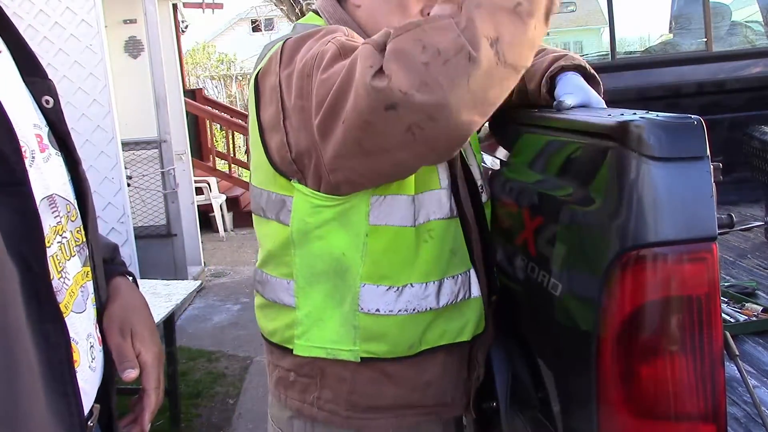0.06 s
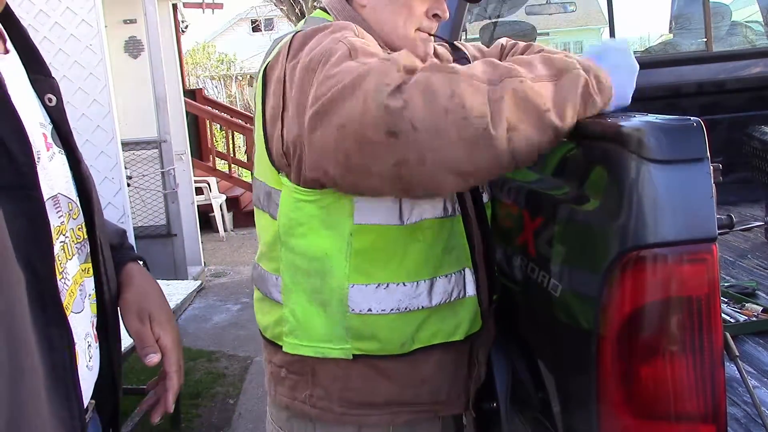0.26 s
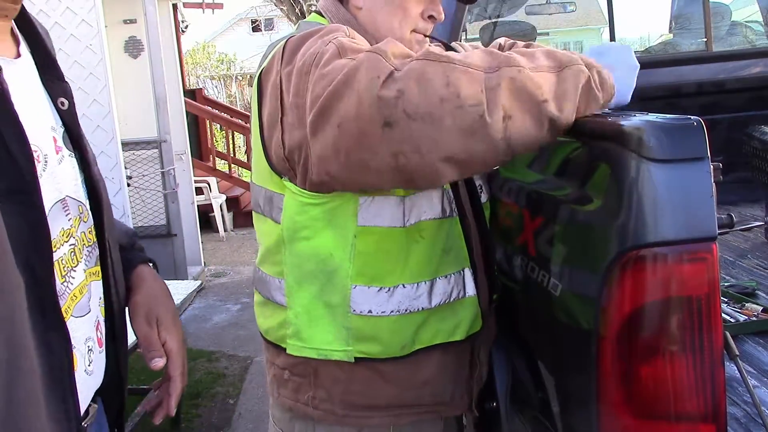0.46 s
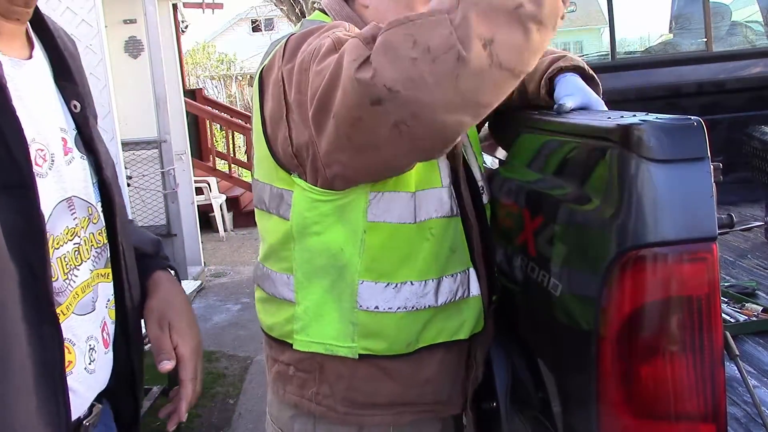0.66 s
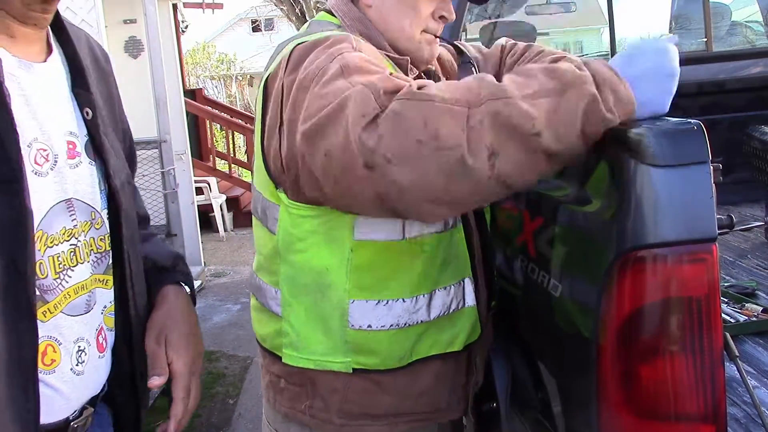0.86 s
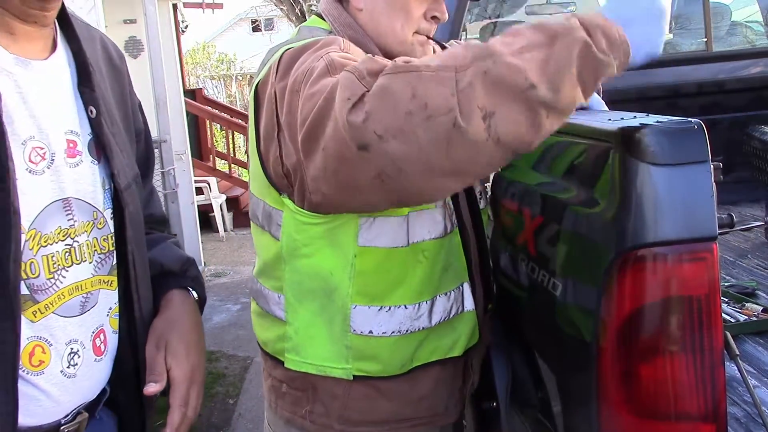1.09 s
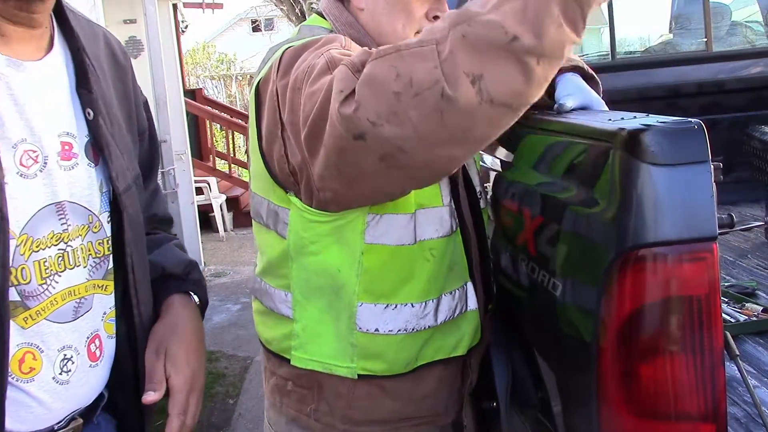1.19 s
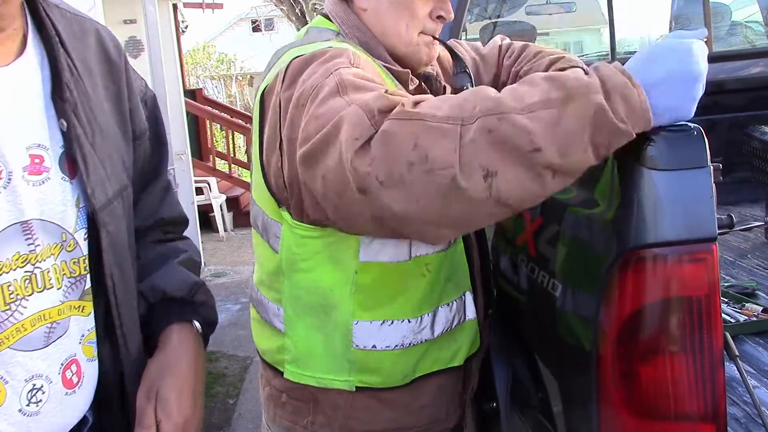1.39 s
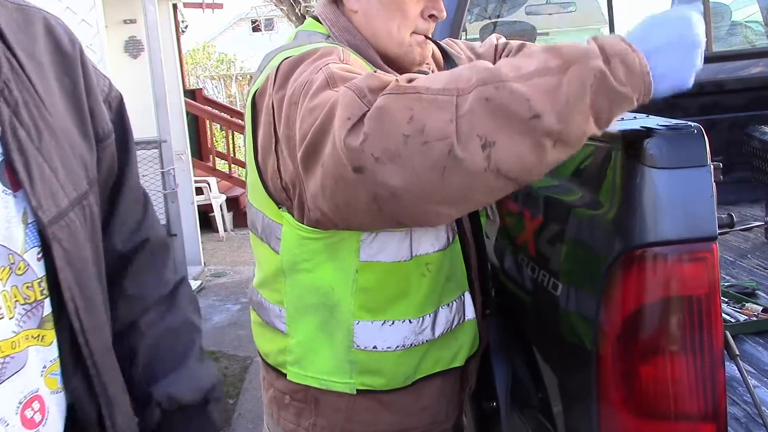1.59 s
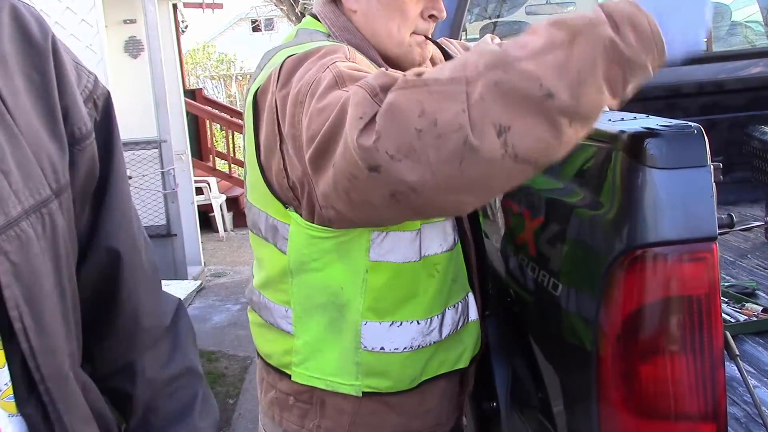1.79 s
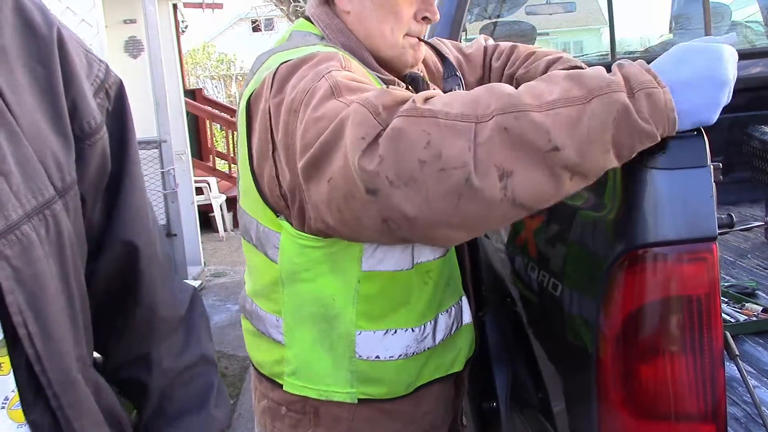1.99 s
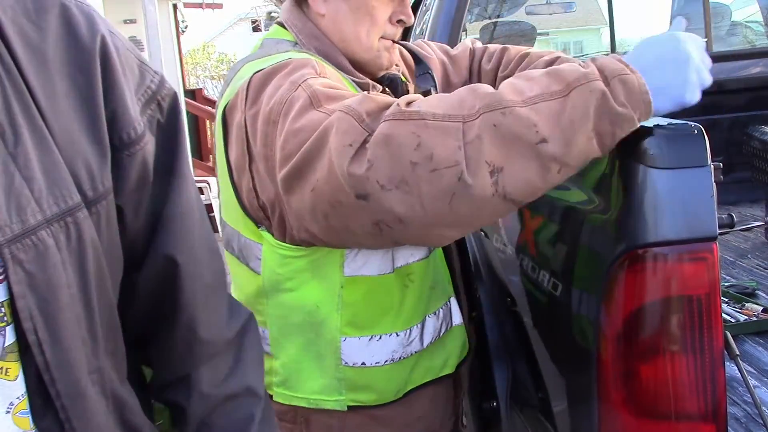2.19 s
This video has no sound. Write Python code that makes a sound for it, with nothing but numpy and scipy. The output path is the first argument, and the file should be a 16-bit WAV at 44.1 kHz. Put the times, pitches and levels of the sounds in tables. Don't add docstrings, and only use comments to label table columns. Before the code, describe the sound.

Close and slightly overloaded, a gloved hand pounds plastic onto a truck's steel bed four times, each sharp crack followed by a hollow boom, rebound and buzzing trim, over soft outdoor hiss and a faint distant engine.

```python
import sys
import numpy as np
from scipy import signal
from scipy.fft import rfft, irfft, next_fast_len
from scipy.io import wavfile
from scipy.ndimage import map_coordinates

SR = 44100
rng = np.random.default_rng(int(sys.argv[2]) if len(sys.argv) > 2 else 0)


def log_audio(samples):
    frames = np.atleast_2d(samples).T
    limited = np.clip(frames, -1, 1)
    pcm = np.round(limited * 32767).astype(np.int16)
    wavfile.write(sys.argv[1], SR, pcm)


def convert_level_to_amplitude(level_db):
    exponent = np.asarray(level_db, float) / 20
    return 10 ** exponent


N = 99225
RING_TIME_S = np.arange(2 * SR // 3) / SR

# start_s, force_db, tilt_db_per_octave, ring_length_factor, boom_db
BLOW_EVENTS = [
    (0.232, -3.5, 0.5, 0.96, -1.5),
    (0.8228, -5.5, -1, 0.97, -6),
    (1.3563, -7, 2, 0.9, 1),
    (1.8438, -9, -0.5, 0.86, -4.5),
]
# freq_hz, level_db
FAR_SIDE = [(30, -12), (100, -21), (400, -17), (1500, -15.5), (5000, -11.5), (8000, -14), (15000, -22)]


def unit(x):
    return x / np.sqrt(np.mean(x ** 2, axis=-1, keepdims=True) + 1e-20)


def along(points, hz):
    point_hz, value = np.transpose(points)
    return np.interp(np.log(hz + 1), np.log(point_hz + 1), value)


def filtered(x, response):
    size = next_fast_len(x.shape[-1] + 8192)
    spectrum = rfft(x, size) * response(np.fft.rfftfreq(size, 1 / SR))
    return irfft(spectrum, size)[..., :x.shape[-1]]


def wobble(rate_hz):
    knots = rng.standard_normal(int(N * rate_hz / SR) + 4)
    return map_coordinates(knots, [np.arange(N) * rate_hz / SR])


def add(out, start_s, sound):
    i = round(start_s * SR)
    out[..., i:i + sound.shape[-1]] += sound[..., :out.shape[-1] - i]


def narrow_noise(hz, width_hz):
    noise = rng.standard_normal(len(RING_TIME_S))
    return unit(filtered(noise, lambda f: np.exp(-((f - hz) / width_hz) ** 2)))


def clicks(rows, cycles, crack, soft_s):
    out = np.zeros(N)
    t = np.arange(SR // 16) / SR
    crack_corner_hz, crack_decay_s = 7400, 0.0019
    for start_s, peak_db, hz in rows:
        tone = np.sin(2 * np.pi * hz * t) * np.exp(-t * hz / cycles)
        grit = filtered(rng.standard_normal(len(t)),
                        lambda f: f / hz / (1 + (f / hz) ** 2) / (1 + (f / crack_corner_hz) ** 2))
        burst = crack * unit(grit) * np.exp(-t / crack_decay_s)
        onset = 1 - np.exp(-t / soft_s)
        add(out, start_s, convert_level_to_amplitude(peak_db) * (tone + burst) * onset)
    return out


def yard_air():
    # freq_hz, level_db_per_hz
    air_colour = [(18, -30), (30, -23), (109, -7), (415, -12), (540, -16.5), (2980, -29), (3490, -29),
                  (3980, -38.5), (16000, -51)]
    level_db, gust_db = -46, 1.8
    hiss = filtered(rng.standard_normal((2, N)),
                    lambda hz: convert_level_to_amplitude(along(air_colour, hz)) * [np.ones_like(hz), convert_level_to_amplitude(along(FAR_SIDE, hz))])
    return convert_level_to_amplitude(level_db + gust_db * wobble(5.35)) * hiss / hiss[0].std()


def far_engine():
    idle_hz, width_hz, level_db = 110, 31, -41
    throb_hz, throb_db = 19, 4.5
    drone = unit(filtered(rng.standard_normal(N), lambda hz: np.exp(-((hz - idle_hz) / width_hz) ** 2)))
    throb = np.sin(2 * np.pi * throb_hz * np.arange(N) / SR + wobble(2.5))
    return convert_level_to_amplitude(level_db + throb_db * throb) * drone


def fading_ring():
    ring_hz, level_db, t60_s = 3450, -57.5, 0.9
    t = np.arange(N) / SR
    level = convert_level_to_amplitude(level_db - 60 * t / t60_s + 2.1 * wobble(60))
    return level * np.sin(2 * np.pi * ring_hz * t + 0.82 * wobble(86))


def sleeve():
    # start_s, level_db
    arm_motion = [(0, -65), (.06, -61), (.085, -59), (.15, -71), (.2, -53.5), (.3, -67), (.8, -71),
                  (.95, -53.5), (1.198, -62), (1.3, -67), (1.6, -59), (1.72, -55.5), (1.8, -55),
                  (2.0, -56.5), (2.1, -60.5), (2.13, -53), (2.201, -53), (2.25, -55.5)]
    # freq_hz, level_db_per_hz
    cloth_colour = [(200, -1), (600, 13), (1200, 9.5), (3000, -1), (4500, -6.5), (8000, -6), (12000, -15),
                    (16000, -24)]
    point_s, level_db = np.transpose(arm_motion)
    motion_db = np.interp(np.arange(N) / SR, point_s, level_db)
    grain = convert_level_to_amplitude(motion_db + 2.2 * wobble(270) + 3.1 * wobble(29.84))
    cloth = filtered(rng.standard_normal((2, N)) * grain, lambda hz: convert_level_to_amplitude(along(cloth_colour, hz)))
    side = filtered(cloth[1], lambda hz: convert_level_to_amplitude(4 + along(FAR_SIDE, hz)))
    return np.array([convert_level_to_amplitude(9) * cloth[0], side])


def loose_ticks():
    # start_s, peak_db, pitch_hz
    tick_events = [(0.0774, -36, 5300), (0.1876, -31, 5500), (0.1916, -26, 5650), (0.217, -40, 6400),
                   (0.2235, -33, 5290), (0.4254, -32, 5420), (0.4668, -52, 5880), (0.5464, -33.5, 6130),
                   (0.585, -37, 6700), (.976, -40, 6900), (1.197, -33, 7540), (1.209, -44, 6160),
                   (.067, -46, 5600), (.64, -43.5, 5980), (1.117, -47, 1500),(1.0575, -41, 7800),
                   (1.1084, -44, 7600), (1.1914, -37, 6750), (1.204, -44.5, 6600), (1.5214, -37, 5520),
                   (1.5798, -50, 5750), (1.591, -34.5, 6050), (1.635, -27, 6240), (1.6413, -34, 5760),
                   (1.672, -31.5, 6400), (1.929, -38.5, 7230), (2.0757, -44, 5470), (2.1993, -40, 7900)]
    return convert_level_to_amplitude(-1.0) * clicks(tick_events, cycles=6.2, crack=0.55, soft_s=0.00056)


def cap_taps():
    # start_s, peak_db, pitch_hz
    tap_events = [
        (.078, -23.5, 2420),
        (.0785, -28.5, 1265),
        (.195, -26.5, 1780),
        (.196, -30, 595),
        (.079, -34.5, 613),
        (.2235, -31, 1960),
        (.586, -27, 1760),
        (2.115, -32.5, 1970),
    ]
    return clicks(tap_events, cycles=3.1, crack=0.34, soft_s=0.00031)


def bed_boom():
    # rise_time_factor, deep_bass_db
    grip = [
        (1.26, -9),
        (0.47, 2),
        (0.75, 3),
        (0.24, -12),
    ]
    # start_s, force_db, tilt_db_per_octave, ring_length_factor, boom_db
    rebounds = [
        (.285, -6.5, 0, 0.58, -3),
        (.87, -6.5, 0, 0.59, -0.5),
        (1.405, -9.5, 0.5, 0.66, -0.5),
        (1.858, -34, -4, 0.9, -1.5),
        (.965, -16.5, 2.5, .35, -7),
        (1.025, -19, -2.5, 0.24, -4),
        (1.062, -25, -1.5, 0.15, 1),
    ]
    # freq_hz, level_db_per_hz
    mode_colour = [(35, -42), (60, -16), (110, -8), (354, -2), (593, -8), (1220, -11.5), (1550, -13),
                   (2000, -14.5), (9790, -33.5), (16000, -44.5)]
    # freq_hz, t60_s
    early_t60 = [(80, 0.45), (200, 0.66), (500, 0.51), (1200, 0.27), (3000, 0.2), (7000, 0.13),
                 (15000, 0.11)]
    # freq_hz, rise_s
    rise_curve = [(80, 0.029), (180, 0.026), (350, 0.012), (800, 0.0049), (3000, 0.0033)]
    # freq_hz, level_db
    late_level = [(100, -13), (500, -16), (2000, -17), (6000, -19.5), (15000, -20)]
    # freq_hz, t60_s
    late_t60 = [(100, 1.94), (500, 1.164), (2000, 0.82), (6000, 0.64), (15000, 0.59)]
    # freq_hz, level_db
    side_level = [(60, -32), (400, -39.5), (1500, -23), (5000, -13), (15000, -18)]
    rebound_rise_s, rebound_deep_db = 0.013, -1.5

    out, t = np.zeros((2, N)), RING_TIME_S
    centres_hz = np.geomspace(60, 16000, num=25)[:, None]
    log_step = np.log(centres_hz[1] / centres_hz[0])

    def band_split(hz):
        overlap = 1 - np.abs(np.log((hz + 1) / centres_hz)) / log_step
        return np.clip(overlap, 0, 1) ** 0.5 * convert_level_to_amplitude(along(mode_colour, hz))

    hits = [(row, slower * along(rise_curve, centres_hz), deep_db)
            for row, (slower, deep_db) in zip(BLOW_EVENTS, grip)]
    hits += [(row, rebound_rise_s, rebound_deep_db) for row in rebounds]
    for (start_s, force_db, tilt_db, longer, boom_db), rise_s, deep_db in hits:
        colour_db = force_db + tilt_db * np.log2(centres_hz / 700)
        colour_db = colour_db + boom_db * (centres_hz < 450) + deep_db * (centres_hz < 150)
        early = convert_level_to_amplitude(-60 * t / (longer * along(early_t60, centres_hz)))
        late = convert_level_to_amplitude(along(late_level, centres_hz) - 60 * t / (longer * along(late_t60, centres_hz)))
        shape = convert_level_to_amplitude(colour_db) * (1 - np.exp(-t / rise_s)) ** 2 * (early + late)
        for channel, spread in enumerate([1, convert_level_to_amplitude(along(side_level, centres_hz))]):
            bands = filtered(rng.standard_normal(len(t)), band_split)
            add(out[channel], start_s, (bands * shape * spread).sum(0) / bands.sum(0).std())
    return out


def struck_spots():
    # freq_hz, level_db, t60_s
    spot_modes = [
        [(198.5, -14, 0.63), (350.6, 0.5, 0.5), (401.3, -8, 0.72), (739, -9, 0.48), (1129, -12.5, 0.31),
         (1346, -6.5, 0.31)],
        [(191, -7.5, 0.8), (354.4, 2.5, 0.37), (404.5, -8, 0.56), (529, -6.5, 0.44), (650, -9, 0.17),
         (950, -10, 0.52)],
        [(344, -15, 0.59), (551, -6, 0.58), (734, -16, 0.36), (1488, -1, 0.27), (1598, -7.5, 0.37),
         (1640, -8, 0.4)],
        [(147.7, -8, 0.69), (189.7, -10, 0.64), (510, -17, 0.31), (750, -7.5, 0.29), (764.4, 1, 0.17),
         (1235, -5.5, 0.16)],
    ]
    level_db, rise_cycles = -3.5, 2.7
    out, t = np.zeros(N), RING_TIME_S
    for (start_s, force_db, *_), modes in zip(BLOW_EVENTS, spot_modes):
        for hz, mode_db, t60_s in modes:
            onset = (1 - np.exp(-t * hz / rise_cycles)) ** 2
            fade = convert_level_to_amplitude(force_db + level_db + mode_db - 60 * t / t60_s)
            add(out, start_s, fade * np.sin(2 * np.pi * hz * t) * onset)
    return out


def clip_snaps():
    # start_s, peak_db, pitch_hz
    snap_events = [(.232, -15, 8000), (.2322, -13.5, 900), (.2338, -9, 3320), (.2378, -1.5, 4750),
                   (.2385, -8, 1500), (.2455, 0.5, 2180), (.2495, -3, 2320), (.2422, -4.5, 4100),
                   (.2435, -19, 1480), (.8229, -12, 1300), (.824, -2, 4120), (.8241, -3.5, 1387),
                   (.8282, -14, 3000), (.8305, -5.5, 3120), (.8335, -6.5, 8200), (1.3566, -8, 1100),
                   (1.3568, -8, 7970), (1.3595, -23.5, 2514), (1.3635, 0, 3230), (1.366, -0.5, 6140),
                   (1.369, -1, 3100), (1.3715, 1, 1290), (1.374, 1, 1630), (1.377, -7, 1640),
                   (1.394, -2, 1700), (1.8448, -8.5, 7700), (1.8462, -7.5, 1880), (1.8478, -11, 2260),
                   (1.8505, -5, 2060), (1.8565, -8, 2500), (1.866, -9, 905)]
    return clicks(snap_events, cycles=2.4, crack=0.43, soft_s=0.00022)


def cap_ring():
    # delay_s, freq_hz, level_db, t60_s
    cap_modes = [
        (0.0092, 1490, -4.5, 0.045),
        (0.00534, 1300, -10.5, 0.05),
        (0.00469, 1535, -7, 0.16),
        (0.00304, 2400, -14, 0.06),
    ]
    width_hz, rise_s = 450, 0.0017
    out, t = np.zeros(N), RING_TIME_S
    for (start_s, *_), (delay_s, hz, level_db, t60_s) in zip(BLOW_EVENTS, cap_modes):
        envelope = convert_level_to_amplitude(level_db - 60 * t / t60_s) * (1 - np.exp(-t / rise_s))
        add(out, start_s + delay_s, envelope * narrow_noise(hz, width_hz))
    return out


def panel_rattles():
    # start_s, freq_hz, width_hz, level_db, t60_s
    rattle_events = [(1.375, 3450, 820, -20.5, 0.31), (1.385, 1520, 310, -15.5, 0.36),
                     (.86, 7000, 5300, -34.5, 0.28), (1.405, 523, 170, -13.5, 0.34),
                     (.835, 345, 50, -12, 0.19), (.865, 414, 77, -12, 0.21), (1.015, 762, 42, -22.5, 0.15),
                     (1.2, 540, 120, -27, 0.13), (0.95, 236, 49, -20.5, 0.14), (.245, 245, 60, -13, 0.32),
                     (.83, 257, 60, -15, 0.22), (1.85, 125, 30, -15, 0.27), (.295, 325, 49, -8.5, 0.19),
                     (1.86, 480, 41, -17, 0.089), (1.905, 644, 44, -19, 0.088)]
    ragged_db, rise_s = 3.05, 0.0053
    out, t = np.zeros(N), RING_TIME_S
    for start_s, hz, width_hz, level_db, t60_s in rattle_events:
        fade = convert_level_to_amplitude(level_db - 60 * t / t60_s + ragged_db * wobble(148)[:len(t)])
        add(out, start_s, fade * narrow_noise(hz, width_hz) * (1 - np.exp(-t / rise_s)))
    return out


def seating_thuds():
    # start_s, peak_db, pitch_hz
    thud_events = [(.246, -21, 210), (.251, -16, 350), (.307, -14, 325), (.828, -8, 385), (.895, -23, 210),
                   (1.846, -7.5, 366), (1.8625, -2, 192.4), (1.866, -5, 447), (1.88, -22, 134.2),
                   (1.899, -16, 138), (1.935, -16, 172)]
    return clicks(thud_events, cycles=1.42, crack=0.05, soft_s=0.0021)


def steel_pings():
    # start_s, peak_db, pitch_hz
    ping_events = [(.4, -36, 9600), (.4254, -47, 9700), (.4673, -43, 9700), (.866, -23, 9700),
                   (.8949, -45, 9540), (.915, -36, 9600), (.9487, -31, 9700), (.9687, -40, 9500),
                   (.9951, -32, 9600), (1.0216, -36.5, 9650), (1.4421, -37, 9400), (1.5214, -35.5, 9650),
                   (1.928, -39, 9500), (1.9659, -45, 9500)]
    return clicks(ping_events, cycles=15, crack=0.05, soft_s=0.00052)


def scene():
    # freq_hz, ratio
    lean = [(200, 0.0086), (1500, 0.0075), (4000, -0.015), (15000, -0.036)]
    contact_side_db = -23
    mid, side = yard_air() + sleeve() + bed_boom()
    mid = mid + far_engine() + fading_ring()
    mid = mid + struck_spots() + cap_ring() + panel_rattles()
    contacts = loose_ticks() + cap_taps() + clip_snaps() + seating_thuds() + steel_pings()
    mid = mid + contacts
    side = side + filtered(mid, lambda hz: along(lean, hz))
    side = side + convert_level_to_amplitude(contact_side_db) * np.diff(np.roll(contacts, 3), prepend=0)
    return np.array([mid + side, mid - side])


def low_pass(x):
    return signal.sosfilt(signal.butter(12, 16820, fs=SR, output="sos"), x)


def record(dry):
    ceiling_db, release_db_per_s, grab_s = 0, 72, 0.0057
    clip_top, clip_hardness = 0.93, 4.2
    top_hz, stop_hz = 15700, 16800
    x = signal.sosfilt(signal.butter(2, 70, "high", fs=SR, output="sos"), dry)
    over_db = np.clip(20 * np.log10(np.abs(x).max(0) + 1e-9) - ceiling_db, 0, None)
    ramp_db = release_db_per_s * np.arange(N) / SR
    held_db = np.maximum.accumulate(over_db + ramp_db) - ramp_db
    grab = np.exp(-1 / (grab_s * SR))
    x = x * convert_level_to_amplitude(-signal.lfilter([1 - grab], [1, -grab], held_db))
    x = x / (1 + np.abs(x / clip_top) ** clip_hardness) ** (1 / clip_hardness)
    x = filtered(x, lambda hz: np.where(hz < top_hz, 1, convert_level_to_amplitude(-22)) * (hz < stop_hz))
    return low_pass(x)


dry = scene()
out = record(dry)
log_audio(out)
```